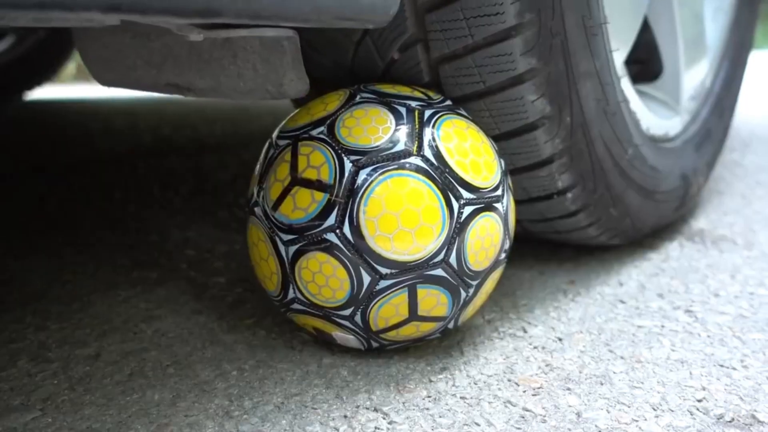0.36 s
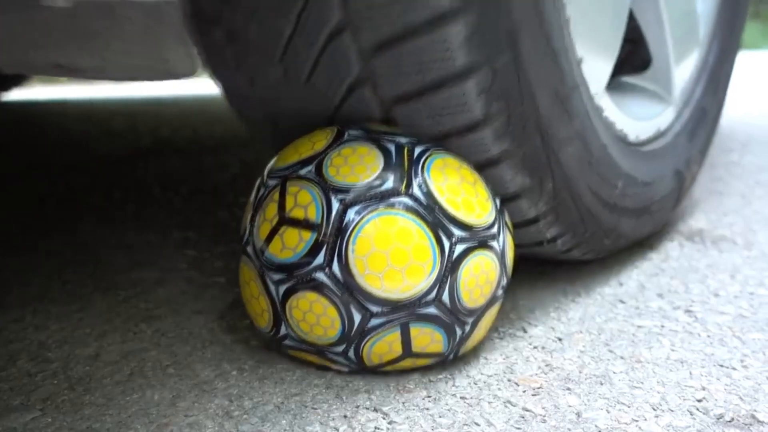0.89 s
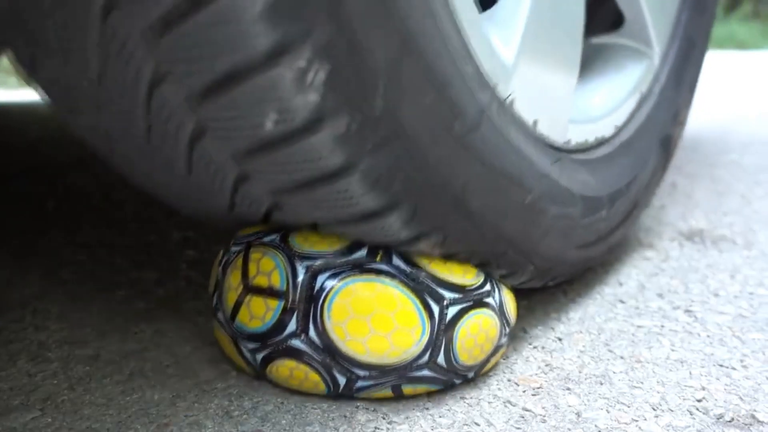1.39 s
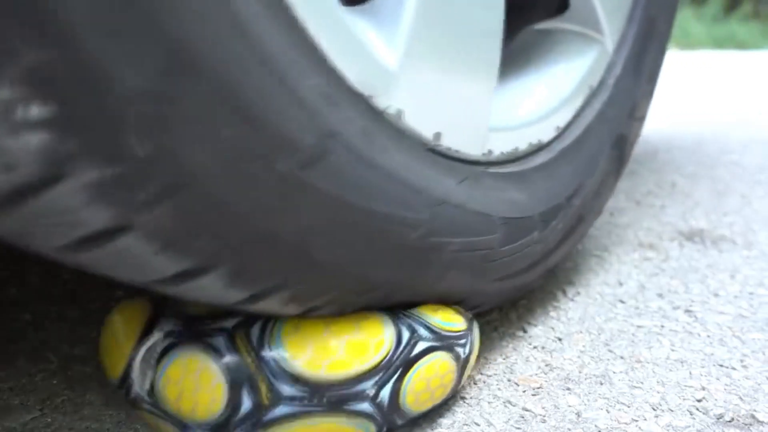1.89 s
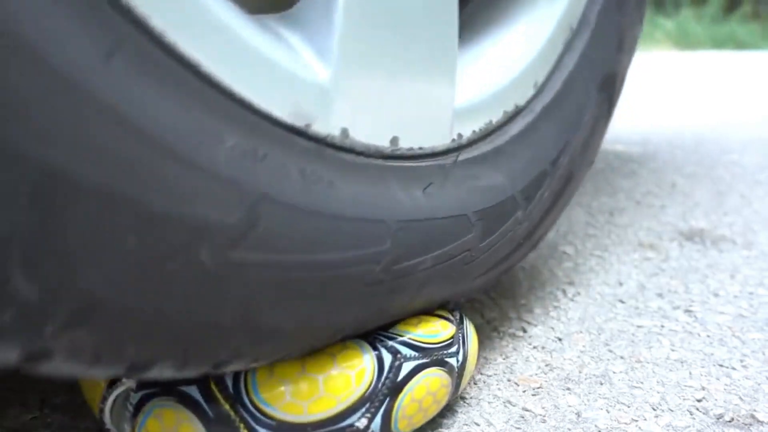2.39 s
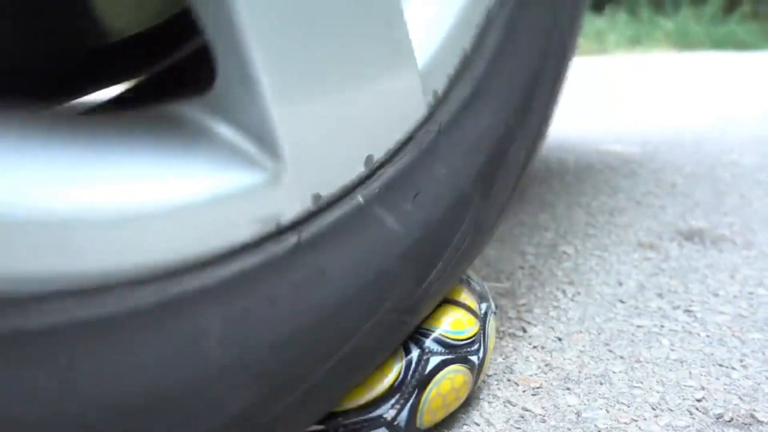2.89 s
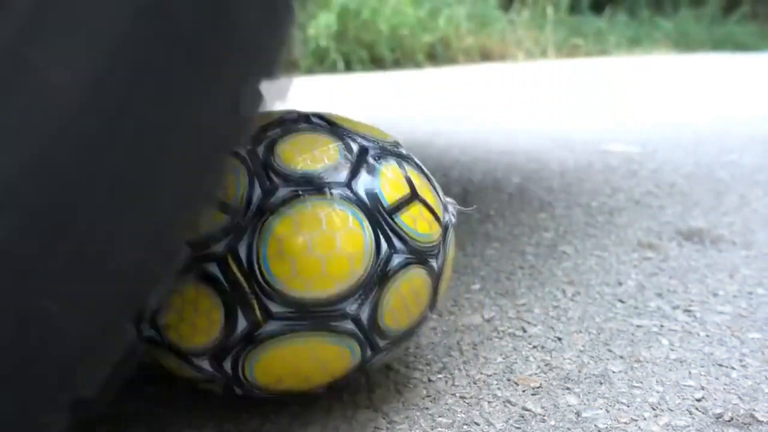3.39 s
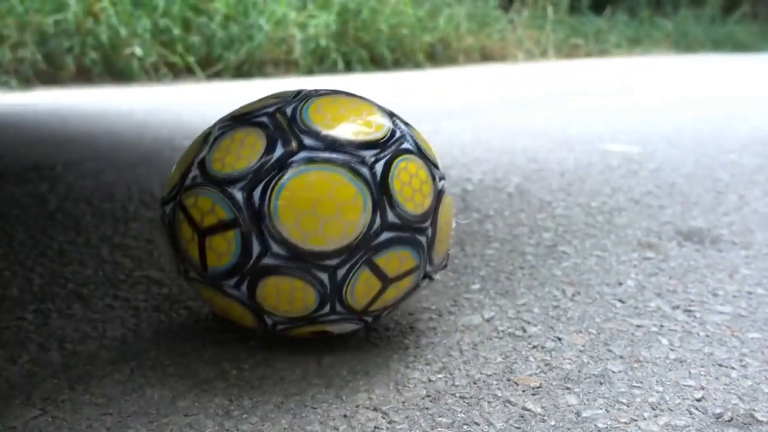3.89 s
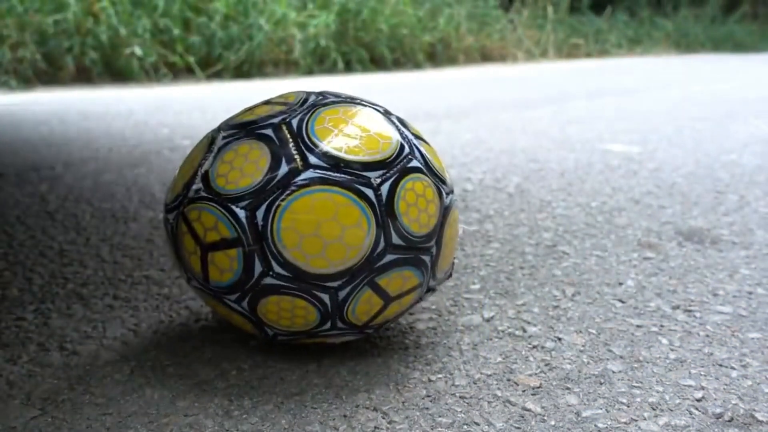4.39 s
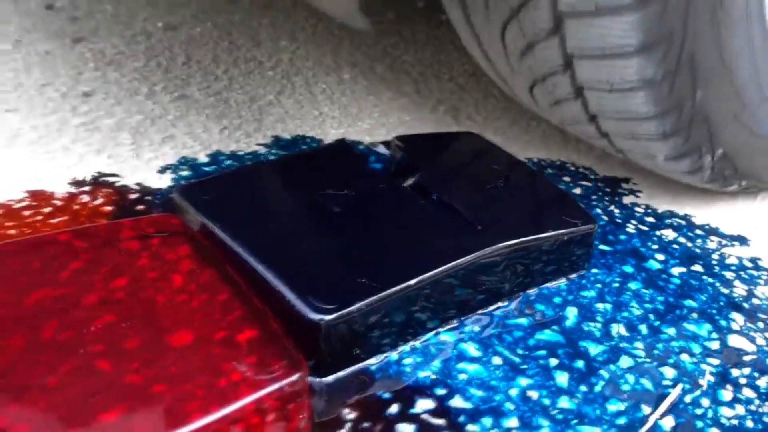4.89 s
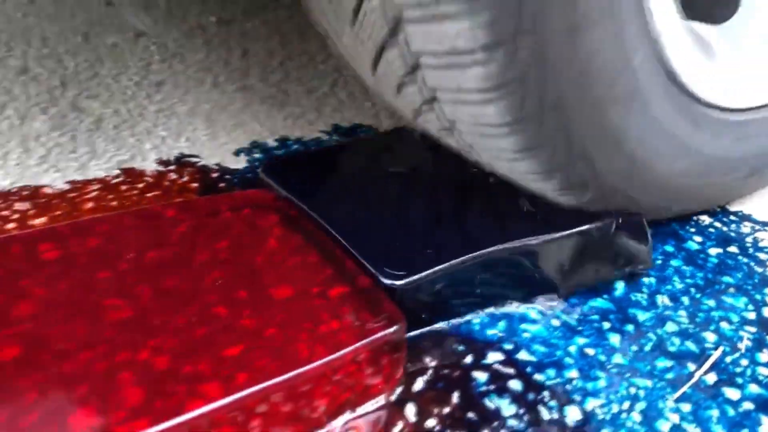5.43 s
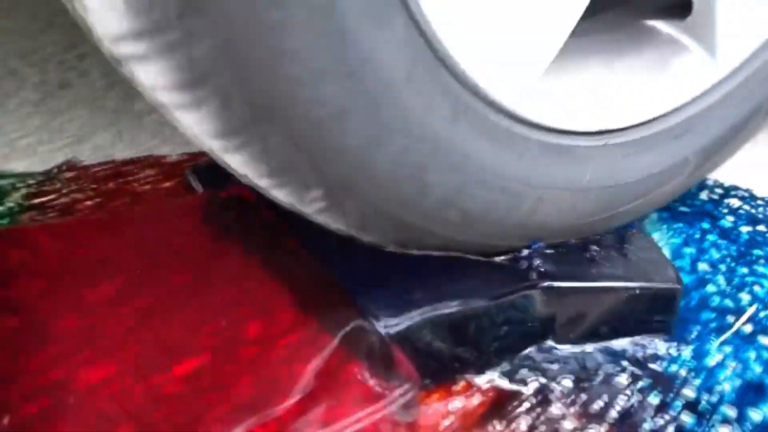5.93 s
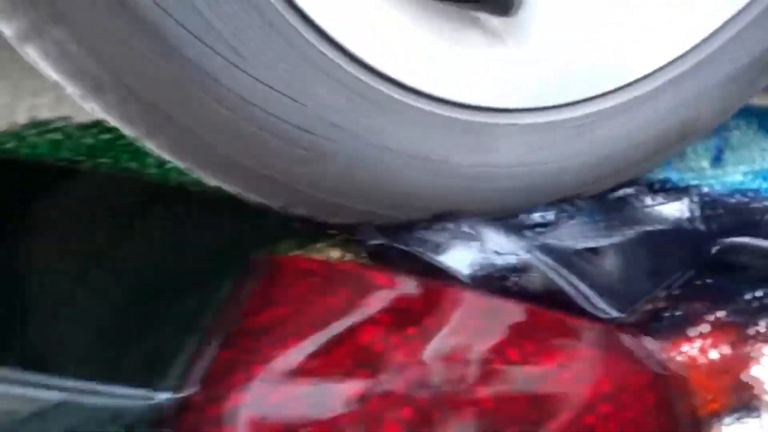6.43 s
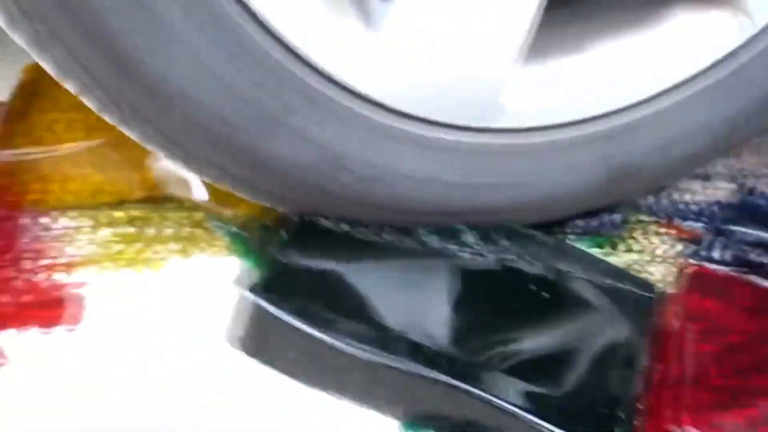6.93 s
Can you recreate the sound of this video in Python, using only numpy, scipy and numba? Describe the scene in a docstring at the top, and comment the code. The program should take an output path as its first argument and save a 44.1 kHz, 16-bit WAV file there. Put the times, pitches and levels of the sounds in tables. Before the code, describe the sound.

Close to asphalt, only faint air is heard until about 0.4 s, when single creaks begin and quicken into a rubbery stutter by 0.9. Low hollow thumps land around 1.0-1.1. Skin rubbing continues with a sharp snap at 1.5, then swells into a loud, rough, midrange groan with deep rumble from 1.7 to 2.2. It drops to a cluster of dry gritty snaps, densest around 2.3-2.9, then rubbing rises again and a shaky harmonic squeal slides upward at 3.15-3.4. The freed ball gives soft hollow bounces and scuffs from 3.55 to 4.1, with faint thin metallic whines fading. After a tiny silent gap at 4.63, an idling engine hums low and pulses softly. Jelly on the left ticks sparsely, with a stronger crack at 5.18, then from 5.7 crackles densely, squelching and tearing wetly, loudest around 6.2-6.6, easing slightly until the end at about 7.

```python
"""Asphalt under a slow car, a small stereo microphone close to the ground. A tyre creeps over a soft ball:
stick-slip pulses and scrape noise ring the skin, clicks snap, harmonics squeal free, damped tones bounce.
After a cut the same slow tyre squashes slabs of jelly on the left: random clicks crackle, bursts of tiny
pops squelch, and wet cracks ring over an idling engine of low harmonics and pulsing noise.
Scattered short echoes stand for the car's underside."""
import sys
import numpy as np
from scipy import signal
from scipy.fft import rfft, irfft
from scipy.io import wavfile
from scipy.ndimage import uniform_filter1d
from numba import njit

SR = 44100
rng = np.random.default_rng(int(sys.argv[2]) if len(sys.argv) > 2 else 0)


def int16_out(signal):
    """Quantize to a 16-bit WAV file."""
    q = np.round(np.clip(np.atleast_2d(signal).T, -1, 1) * 32767)
    wavfile.write(sys.argv[1], SR, q.astype(np.int16))


def amplitude_ratio(level_db):
    """Convert a level in decibels to the matching linear amplitude (field) ratio."""
    exponent = np.asarray(level_db, float) / 20
    return 10 ** exponent


N = 310905
T = np.arange(N) / SR
SIDES = np.array([[1], [-1]])  # left, right
HARD_DB = -20  # rubbing level at which the ball's settings hold
JELLY_LAG = 8  # samples by which the right microphone hears the jelly later


def unit(x):
    """Scale to rms 1."""
    return x / np.sqrt(np.mean(x ** 2))


def read(table):
    """Columns of a timed table at every sample, and where it is active."""
    s, *columns = np.transpose(table)
    active = uniform_filter1d(1. * ((T >= s[0]) & (T <= s[-1])), size=441)
    return [np.interp(T, s, c) for c in columns] + [active]


def colour(x, points, size=4096):
    """Causal filter through (Hz, dB) points, from the folded cepstrum of the log gain; output rms 1."""
    hz, db = np.transpose(points)
    bins_hz = np.arange(size // 2 + 1) * SR / size
    gain_db = np.interp(np.log(bins_hz + 1), np.log(hz), db)
    cepstrum = irfft(gain_db * np.log(10) / 20)
    cepstrum[1:size // 2] *= 2
    cepstrum[size // 2 + 1:] = 0
    response = irfft(np.exp(rfft(cepstrum)))
    return unit(signal.fftconvolve(x, response)[:N])


@njit
def svf(x, hz, width):
    """State-variable band-pass with a moving centre, gain 1 there; width in Hz."""
    y, band, low = np.empty(len(x)), 0., 0.
    for i in range(len(x)):
        g, k = np.tan(np.pi * hz[i] / SR), width / hz[i]
        v = (band + g * (x[i] - low)) / (1 + g * (g + k))
        band, low, y[i] = 2 * v - band, low + 2 * g * v, k * v
    return y


def high_pass(x, hz, order=1):
    """Butterworth high-pass."""
    return signal.sosfilt(signal.butter(order, hz, "high", fs=SR, output="sos"), x)


def walk(rate):
    """Random levels held 1 / rate s and slewed twice; spread near 1."""
    k = int(SR / rate)
    held = np.repeat(rng.standard_normal(N // k + 1), k)
    return 1.288 * uniform_filter1d(uniform_filter1d(held, k), k)[:N]


def tail(x, ms):
    """Let each impulse die away exponentially, with a time constant in ms."""
    return signal.lfilter([1], [1, -np.exp(-1000 / (ms * SR))], x)


def place(x, pan_db, lag=0):
    """Share between the two microphones; the right one hears it lag samples later."""
    left = 2 / (1 + amplitude_ratio(-pan_db))
    return np.array([x * left, np.roll(x, lag) * (2 - left)])


def add(out, s, x, pan_db, lag):
    """Mix one short sound in at time s."""
    i = int(s * SR)
    out[:, i:i + len(x)] += place(x, pan_db, lag)[:, :N - i]


def wide(points, shared):
    """Stereo noise of one colour, partly shared by the microphones."""
    mid, side = (colour(rng.standard_normal(N), points) for _ in range(2))
    return mid + (1 - shared) * high_pass(side, 900) * SIDES


def spread(x, low_db, high_db):
    """A broad contact patch: the sound flutters between left and right, the treble most."""
    return x + (amplitude_ratio(low_db) * x + amplitude_ratio(high_db) * high_pass(x, 1500)) * walk(300) * SIDES


def underside(x, db, t60):
    """Short scattered echoes from the car's floor and the road, different at each microphone."""
    t = np.arange(4096) / SR
    echo = rng.standard_normal((2, 4096)) * amplitude_ratio(-60 * t / t60) * (t > .0008)
    echo = high_pass(echo, 700)
    wet = signal.fftconvolve(x, echo / np.sqrt(np.sum(echo ** 2, axis=1, keepdims=True)), axes=1)
    return x + amplitude_ratio(db) * wet[:, :N]


def clicks(table, fizz_db, t60, echo_db, lag, sharp=0.91):
    """A sharp tick ringing broadly around its centre, a fizzing tail, and a slap back from the car's floor."""
    out, size = np.zeros((2, N)), 1536
    t, noise = np.arange(size) / SR, rng.standard_normal((80, size))
    for (s, db, hz, top_db, pan_db), fizz in zip(table, noise):
        kick = amplitude_ratio(fizz_db - 60 * t / t60) * fizz
        kick[0] += 1
        kick[int(.0034 * SR)] += amplitude_ratio(echo_db)
        centre = np.full(size, 1. * hz)
        # sharper ticks share one bandwidth
        width = hz ** (1 / sharp) * 1800 ** (1 - 1 / sharp) / sharp
        body = svf(svf(kick, centre, width * 1.05), centre, width * 3.5 / sharp)
        top = high_pass(kick, 5000, order=2)
        tick = body / np.abs(body).max() + amplitude_ratio(top_db) * top / np.abs(top).max()
        add(out, s, amplitude_ratio(db) * tick / np.abs(tick).max(), pan_db, lag)
    return out


def sputters(table, lag):
    """Clusters of tiny pops, each cluster ringing at its own pitch; they start faster than they end."""
    out, size = np.zeros((2, N)), 4096
    t = np.arange(-size // 2, size // 2) / SR
    chance = rng.standard_normal((len(table), 2, size))
    for (s, db, hz, length, pan_db), (fizz, grain) in zip(table, chance):
        env = np.exp(-.5 * (t / (np.where(t < 0, .26, .55) * length)) ** 2)
        pitch = np.full(size, 1. * hz)
        grains = fizz * np.exp(1.3 * grain) * env
        pops = svf(svf(grains, pitch, hz / 5.5), pitch, hz / 2.2)
        even = np.sqrt(np.sum(env ** 2) / np.sum(pops ** 2))
        add(out, s + t[0], amplitude_ratio(db) * pops * even, pan_db, lag)
    return out


# steady background air at the microphones: [freq_hz, relative density_db per Hz]
AIR_COLOUR = [(15, -45), (25, -6), (54, -9), (92, -11), (146, -6), (193, -8.5), (231, -7.5), (1180, -18.5),
              (2820, -19), (4140, -31), (11200, -34), (14600, -71), (22000, -120)]


def air():
    """Faint wide noise, almost independent at the two microphones in the treble."""
    return amplitude_ratio(-56.5 + .5 * walk(32.0)) * wide(AIR_COLOUR, 0.046)


@njit
def slips(rate, uneven, chance):
    """Stick-slip: one release per cycle; uneven cycles vary in length and size."""
    out, p, k = np.zeros(len(rate)), 0., 0
    for i in range(len(rate)):
        p += rate[i] * np.exp(uneven[i] * chance[k, 0]) / SR
        if p >= 1:
            p, k = p - 1, k + 1
            out[i] = np.exp((.2 + .45 * uneven[i]) * chance[k, 1])
    return out


# stretches where the contact changes:
# [middle_s, length_s, grit_db change, unevenness taken away (0-1), scrape_db change]
CONTACT_CHANGES = [(0.58, 0.72, -5, .05, 1), (.6, 0.37, 1.3, .05, 3), (1.864, 0.1, 2.5, 0.03, 2.5),
                   (2.427, 0.2, -3, 0, 1.5), (2.62, 0.21, -0.5, .25, -5), (2.766, 0.62, 4.5, 0.4, 3),
                   (3.235, 0.13, 6, 0.12, -4), (3.9, 0.98, 0, 0.03, 13), (4.45, 0.53, 3.5, 0, 16)]


def contact(column):
    """Sum of one column of the contact changes, each a flat-topped bell."""
    return sum(row[column] * np.exp(-((T - row[0]) / (.5 * row[1])) ** 4) for row in CONTACT_CHANGES)


# the ball lurches under the load: [middle_s, length_s, rumble_db, boom_db]
LURCH_TIMES = [(0.757, 0.13, -45.5, -51), (1.028, 0.096, -39, -50), (1.13, 0.048, -42, -43.5),
               (1.562, 0.019, -43, -66), (1.817, 0.12, -28.5, -23), (1.97, 0.14, -36, -28.5),
               (3.106, 0.089, -36.5, -42), (3.3, 0.045, -37, -60), (3.565, 0.13, -48, -56),
               (3.752, 0.76, -59, -55.5), (4.038, 0.09, -65, -60)]


def lurch(column):
    """Summed gain of the lurches, each a bell in time, added as powers."""
    return np.sqrt(sum(amplitude_ratio(2 * row[column]) * np.exp(-((T - row[0]) / (.5 * row[1])) ** 2)
                       for row in LURCH_TIMES))


# the air in the ball, upper and lower part: [freq_hz, relative density_db per Hz]
RUMBLE_COLOUR = [(65, -23), (110, -4.5), (199, -2.5), (232, 5.5), (273, -3), (324, -21), (350, 0.5),
                 (460, -21), (770, -120)]
BOOM_COLOUR = [(21, -53), (35, -32), (48, -28), (75, -9.5), (120, -13.5), (160, -14.5), (260, -120)]


def ball_air(effort):
    """The air in the ball follows the rubbing and swells at each lurch: a rumble and a deeper boom."""
    rumble_gain = np.hypot(amplitude_ratio(-35.5 + 1.03 * effort), lurch(column=2))
    rumble = rumble_gain * amplitude_ratio(0.54 * walk(23.0)) * colour(rng.standard_normal(N), RUMBLE_COLOUR)
    boom_gain = np.hypot(amplitude_ratio(-44 + effort), lurch(column=3))
    boom = boom_gain * amplitude_ratio(2.0 * walk(9.55)) * colour(rng.standard_normal(N), BOOM_COLOUR)
    return rumble + boom


# ball under the tyre: [s, rubbing level_db, dryness_db, skin resonance_hz]
RUBBING = [(0.0, -65.5, -27, 800), (0.2, -68.5, -6, 700), (0.4, -75.5, -15, 700), (0.444, -59, -21, 635),
           (0.56, -52, 3, 770), (0.676, -44, 0.5, 970), (0.82, -41, 4, 734), (0.916, -32, -4, 675),
           (1.09, -37, -2.5, 736), (1.3, -33.5, -7, 860), (1.42, -33.5, -9, 1050), (1.568, -40, -3, 900),
           (1.65, -34, -5.5, 910), (1.67, -21, -8.5, 850), (1.7, -29, 2.5, 950), (1.756, -17.5, -15, 1027),
           (1.88, -19.5, -8.5, 1025), (2.0, -17.5, -13, 935), (2.13, -18.5, -11.5, 1046),
           (2.22, -23, -9, 1046), (2.27, -28.5, -13.5, 1060), (2.32, -40, -2, 980),
           (2.43, -41.5, 6.5, 1150), (2.55, -38, -4.5, 990), (2.65, -33.5, -5, 990), (2.8, -34, -9.5, 960),
           (2.95, -31, -6.5, 940), (3.02, -31, -6.5, 845), (3.085, -27, -9.5, 940),
           (3.125, -28.5, -10, 680), (3.208, -21.5, -10, 1370), (3.232, -23, -7.5, 1440),
           (3.26, -23, -8.5, 915), (3.3, -24, -5, 940), (3.4, -22.5, -11.5, 930),
           (3.468, -30.5, -12.5, 769), (3.54, -50, -6, 666), (4.074, -51.5, -10.5, 805),
           (4.44, -68, -2.5, 730), (4.546, -57, -11, 690), (4.63, -62.5, -11, 680)]
# stretched skin, its grit, its dry hiss: [freq_hz, relative density_db per Hz]
SKIN_COLOUR = [(180, -42), (300, 8.5), (417, 3), (1000, -2), (1230, 2.5), (1370, 1), (1710, -3.5),
               (2500, -13), (3250, -41), (5500, -120)]
GRIT_COLOUR = [(1290, -16.5), (2200, 1), (3580, -1.5), (5800, -11.5), (7540, -28.5), (12800, -120)]
HISS_COLOUR = [(3060, -40), (5200, -11), (6350, -4), (10500, -4), (11200, -11.5), (14600, -15),
               (22000, -120)]
# narrow modes of the stretched skin: [share of the skin resonance, gain_db]
SKIN_RINGS = [(1.0, 23), (1.32, 13), (0.78, 9)]
# where the ball sits: [s, left minus right_db]
BALL_SIDE = [(0, 1), (.42, -2), (1.6, 0), (2.0, 1), (2.4, -0.5), (3.4, 0.5), (4.07, 5), (4.45, 10),
             (4.63, 9)]


def ball():
    """Slips and scrape drive the skin; harder rubbing slips faster, less evenly, and scrapes more."""
    skin_db, dry_db, hz, on = read(RUBBING)
    effort = skin_db - HARD_DB
    rate = 330 * amplitude_ratio(0.46 * effort)  # slips per s
    uneven = np.clip(.62 + 0.27 * effort - contact(column=3), .1, .8)
    scrape_db = 1 + 0.2 * effort + contact(column=4)
    pulses = slips(rate, uneven, rng.standard_normal((4000, 2)))
    kicks = pulses + 0.41 * tail(pulses, 2.17) * rng.standard_normal(N)
    # equal power whatever the slip rate
    kicks = kicks / np.sqrt(uniform_filter1d(kicks ** 2, size=4000) + 1e-9)
    scrape = amplitude_ratio(scrape_db + 1.5 * walk(40)) * rng.standard_normal(N)
    drive = (kicks + scrape) / np.sqrt(1 + amplitude_ratio(2 * scrape_db))

    skin = colour(drive, SKIN_COLOUR)
    rings = 0
    for share, db in SKIN_RINGS:
        wandering_hz = share * hz * (1 + .03 * walk(30))
        rings = rings + amplitude_ratio(db + 2.5 * walk(40)) * svf(skin, wandering_hz, 90.)
    skin = unit(skin + 10.0 * svf(skin, hz, 490.0) + rings)
    # dry contact hisses and grinds
    grit = amplitude_ratio(0.6 + 0.72 * dry_db + contact(column=2)) * colour(drive, GRIT_COLOUR)
    hiss = amplitude_ratio(dry_db) * colour(drive + .25 * kicks, HISS_COLOUR)
    rub = amplitude_ratio(skin_db) * (skin + grit + hiss)
    placed = place(on * rub + squeal(), read(BALL_SIDE)[0])
    return spread(placed + on * ball_air(effort), -20.0, -21.0)


# the ball's hollow thumps and bounces: [start_s, level_db, pitch_hz, t60_s]
THUMP_TIMES = [(0.149, -41.5, 645, 0.059), (1.012, -15, 122, 0.15), (1.036, -12.5, 152, 0.051),
               (1.121, -11, 220, 0.016), (1.556, -20.5, 205, 0.046), (1.752, -42, 119, 0.044),
               (1.846, -23, 99, 0.11), (3.555, -22.5, 310, 0.037), (3.592, -38, 330, .025),
               (3.617, -29, 370, 0.042), (3.782, -34, 520, 0.053), (3.813, -34, 470, 0.055),
               (3.891, -27, 286, 0.034), (3.909, -34, 180, 0.036), (3.93, -31, 297.4, 0.035),
               (3.97, -31, 463, 0.045), (3.992, -31, 460, 0.033), (4.013, -24, 315, 0.02),
               (3.996, -36, 130, .07), (4.033, -38, 148, 0.069), (4.521, -37.5, 229, 0.045)]


def thumps():
    """A soft push rings the ball's air and a higher skin mode."""
    out, t = np.zeros((2, N)), T[:8192]
    for s, db, hz, t60 in THUMP_TIMES:
        ring = np.sin(2 * np.pi * hz * t) + 0.15 * np.sin(2 * np.pi * 1.75 * hz * t)
        push = 1 - np.exp(-t / 0.0014)
        add(out, s, amplitude_ratio(db - 60 * t / t60) * push * ring, 0, lag=0)
    return out


# first contact, single creaks: [start_s, peak_db]
CREAK_TIMES = [(.355, -50), (.387, -47), (.418, -45), (.443, -38), (.465, -40), (.487, -36), (.508, -29),
               (.526, -32), (.545, -25), (.567, -32), (.576, -24), (.602, -24), (.62, -28), (.628, -21),
               (.645, -18), (.661, -16), (.676, -17), (.691, -19), (.704, -18), (.717, -23), (.729, -17),
               (.742, -18), (.755, -17), (.768, -17), (.784, -18), (.797, -17), (.81, -16), (.831, -14),
               (.845, -20), (.856, -11.5), (.883, -11.5), (.902, -17), (.922, -14), (.955, -17),
               (.982, -18)]
# their usual pitch: [s, centre_hz]
CREAK_PITCH = [(.44, 640), (.55, 1180), (.7, 1030), (.8, 620), (.93, 720)]


def creaks():
    """Single slips of the skin: broad ticks of scattered pitch and side."""
    chance = rng.standard_normal((len(CREAK_TIMES), 2))
    s, db = np.transpose(CREAK_TIMES)
    hz = np.interp(s, *np.transpose(CREAK_PITCH)) * amplitude_ratio(1.2 * chance[:, 0])
    treble_db, pan_db = np.full(len(s), 3), 1.2 + 2.2 * chance[:, 1]
    rows = np.c_[s, db, hz, treble_db, pan_db]
    return clicks(rows, fizz_db=-3, t60=.018, echo_db=-17, lag=0, sharp=0.69)


# grit and seams snapping: [start_s, peak_db, centre_hz, treble peak_db against it, left minus right_db]
SNAP_TIMES = [(1.141, -29, 703, -10, 3), (1.326, -30, 961, -21.5, 6), (1.505, -4.5, 1610, -30, 2),
              (1.578, -20, 2030, -23, 0.0), (1.607, -11, 3180, -19, 3), (1.632, -11.5, 1740, -19, -1),
              (1.668, -5, 730, -12.5, 4), (1.715, -5, 1080, -13, 1), (1.892, -5, 1150, -19, 18),
              (1.946, -4, 1330, -24, 7), (2.166, -9, 1010, -19, 3), (2.194, -21, 1100, -6, 3.5),
              (2.258, -12, 2900, -13, 2), (2.266, -11, 1538, -22, 1), (2.278, -30, 1993, -17, -0.5),
              (2.2955, -16, 2001, -16, -4), (2.317, -14, 2040, -17, -2), (2.349, -10.5, 2950, -22, -3),
              (2.374, -22, 1690, -11, -6), (2.391, -11, 2110, 3, 4), (2.409, -18.5, 2950, -3, -15),
              (2.4365, -11.5, 1500, -20, -1), (2.5187, -9, 2500, -8.5, 0), (2.585, -15, 2580, -15, -3),
              (2.606, -15, 2310, -16, -4), (2.681, -9, 2370, -18, 0), (2.72, -11, 2476, -17, -3),
              (2.7235, -8, 2200, -22, -1), (2.754, -15, 2300, -17, -1), (2.79, -12, 2730, -13, -4),
              (2.7405, -8.5, 2219, -23, -3), (2.7512, -6, 2110, -5, -1.5), (2.7716, -22, 3630, -24, -8),
              (2.794, -6.5, 2278, -7, -5), (2.808, -6.5, 2600, -11, -3), (2.7295, 0, 3500, -4, -3),
              (2.655, -13, 4530, -13, -1), (2.8739, -13.5, 3701, -16, -2), (2.897, -12, 2500, -15, -1),
              (3.017, -12.5, 700, -28, -1), (3.148, -12, 1100, -16, 5), (3.202, -5, 1490, -21, 6),
              (3.617, -30, 1073, -23, 11), (3.783, -32, 654, -25, -4), (3.813, -28, 1047, -20, 10),
              (3.892, -30, 600, -21, 11), (3.9715, -25, 2350, -27, -13), (4.117, -36, 600, -16, -2),
              (4.1444, -26.5, 4770, -4, 2), (3.7593, -37, 7350, -9, 1), (3.8621, -29, 4200, -3, 2),
              (3.9648, -33, 6330, -8, 0), (3.9948, -33, 5200, -12, 1), (4.0212, -31.5, 6500, -9, -1),
              (4.077, -38, 1250, -25, 5), (4.037, -33, 1300, -25, 5), (4.215, -41, 646, -21, 7)]


def snaps():
    """Grit and seams let go: short dry ticks with a brief fizz."""
    return clicks(SNAP_TIMES, fizz_db=-18.5, t60=0.008, echo_db=-22, lag=0)


# the skin squeals as it slides out: [s, pitch_hz, level_db]
SQUEAL_PATH = [(3.13, 268, -50), (3.154, 261.3, -36), (3.198, 304.9, -31.5), (3.245, 284, -28),
               (3.29, 281.4, -27), (3.318, 294, -22.5), (3.33, 332, -24), (3.365, 334.4, -23.5),
               (3.394, 347, -37), (3.44, 357, -54)]
# strength of the squeal's harmonics: [freq_hz, level_db]
SQUEAL_COLOUR = [(280, -4), (600, -7), (950, 2), (1200, -6), (1500, -7), (2100, -13), (2800, -12),
                 (3600, -20)]


def squeal():
    """Regular fast slips: a stack of harmonics on a shaky pitch, each flickering."""
    pitch, db, sliding = read(SQUEAL_PATH)
    near = sliding > 0
    phase = 2 * np.pi * np.cumsum(pitch * (1 + .014 * walk(120)))[near] / SR
    hz, body_db = np.transpose(SQUEAL_COLOUR)
    out = np.zeros(N)
    for k in range(1, 13):
        flicker_db = 4.0 * walk(50)[near]
        harmonic_db = np.interp(np.log(k * pitch[near]), np.log(hz), body_db) + flicker_db
        out[near] += amplitude_ratio(harmonic_db) * np.sin(k * phase + 0.421 * k * k)
    return np.sqrt(2) * sliding * amplitude_ratio(db) * out


# faint metal whines as the wheel rolls off: [pitch_hz, start_s, level_db, t60_s]
WHINE_TONES = [(2120, 3.5, -46, 0.43), (1840, 3.44, -52.5, 3.2)]


def whines():
    """Narrow wavering tones that fade: noise through a very narrow band."""
    noise, out = rng.standard_normal(N), 0
    for hz, s, db, t60 in WHINE_TONES:
        fade = (T > s) * amplitude_ratio(db - 60 * np.maximum(T - s, 0) / t60)
        out = out + fade * unit(svf(noise, np.full(N, 1. * hz), 8.))
    return out


# the freed ball scuffs the road as it settles: [middle_s, level_db, pitch_hz, length_s, left minus right_db]
SCUFF_TIMES = [(3.625, -45, 950, 0.015, 2), (3.785, -47, 603, 0.0069, 0), (3.822, -40.5, 1350, 0.014, 3),
               (3.9, -45.5, 500, 0.026, -2), (3.935, -42, 840, 0.0086, 7), (3.974, -33.5, 2280, 0.004, -1),
               (3.98, -43.5, 1420, 0.02, 7), (4.02, -48, 450, 0.011, 1), (4.117, -46, 1392, 0.0063, 8)]


def scuffs():
    """The freed ball brushes the road: small clusters of pops."""
    return sputters(SCUFF_TIMES, lag=0)


# harmonics of the idle: [multiple of the firing rate, level_db]
FIRING_HARMONICS = [(2, -14), (3, -4), (5, -20), (10, -16)]
# engine body noise: [freq_hz, relative density_db per Hz]
ENGINE_COLOUR = [(15, -26), (25, -3), (69, -3), (168, -5.5), (226, -7), (438, -11), (515, -6.5), (753, -10),
                 (1400, -17), (1930, -15.5), (3000, -23.5), (3900, -25), (6600, -120)]


def engine():
    """Low harmonics of the firing rate and a body noise that puffs with each firing, louder under load."""
    idle_hz, loaded_s = 22.6, 5.2
    phase = np.cumsum(idle_hz * (1 + 0.004 * walk(3))) / SR
    drone = sum(amplitude_ratio(db + 1.2 * walk(6)) * np.sqrt(2) * np.sin(2 * np.pi * k * phase)
                for k, db in FIRING_HARMONICS)
    noise_db = np.interp(T, [loaded_s - .3, loaded_s + 0.48], [-42.5, -40.5]) + 2.0 * walk(9)
    puffs = 1 + 0.21 * np.cos(2 * np.pi * phase)
    return amplitude_ratio(-42.5) * drone + amplitude_ratio(noise_db) * puffs * wide(ENGINE_COLOUR, 0.2)


# jelly under the tyre: [s, crackle level_db, left minus right_db]
SQUASHING = [(4.659, -50.5, 10), (4.85, -48, 13.5), (5.17, -48.5, 9.5), (5.619, -51.5, 6.5),
             (5.72, -42, 18), (5.9, -37, 16.5), (6.16, -32.5, 13), (6.54, -34.5, 14), (7.05, -38.5, 9)]
# wet crackle and its treble fizz: [freq_hz, relative density_db per Hz]
JELLY_COLOUR = [(240, -48), (400, -4.5), (828, -0.5), (1170, -5), (1920, 0), (2250, -0.5), (2440, 2),
                (4800, -8.5), (6240, -14.5), (10600, -120)]
FIZZ_COLOUR = [(2470, -10.5), (4200, -24), (5440, -2), (6570, -1), (10600, -6), (11200, -11), (14600, -48),
               (22000, -120)]


def jelly():
    """Fine wet crackle: random clicks over a fizz; pockets of each size come and go on their own."""
    level_db, pan_db, on = read(SQUASHING)
    pops = (rng.random(N) < 1200 / SR) * amplitude_ratio(1.8 * rng.exponential(size=N))  # 1200 per s
    drive = unit(tail(pops, .4) * rng.standard_normal(N)) + .9 * rng.standard_normal(N)
    body = colour(drive, JELLY_COLOUR)
    pockets = sum(amplitude_ratio(3.2 * walk(55)) * svf(body, np.full(N, hz), hz / 2.5)
                  for hz in 600 * 1.5 ** np.arange(6))
    fizz_db = -41 + 1.01 * (level_db + 34)  # -41 dB where the crackle is at -34 dB
    fizz = amplitude_ratio(fizz_db + 1.2 * walk(45)) * colour(drive, FIZZ_COLOUR)
    return place(amplitude_ratio(level_db) * unit(pockets) + fizz, pan_db, lag=JELLY_LAG)


# sharp cracks as the jelly tears: [start_s, peak_db, centre_hz, treble peak_db against it]
CRACK_TIMES = [(4.736, -36, 1190, -22), (4.753, -24, 1070, -21), (4.786, -28, 2140, -22),
               (4.818, -21.5, 1840, -26), (4.886, -21.5, 3660, -12), (4.893, -24, 2290, -14),
               (4.939, -26.5, 2600, -27), (5.02, -40, 4540, -20), (5.063, -24, 2200, -22),
               (5.085, -28, 802, -23), (5.18, -13.5, 1010, -4), (5.1799, -18.5, 2350, -10),
               (5.296, -31, 4800, -11), (5.327, -23.5, 2720, 1), (5.687, -27, 2440, -23),
               (5.781, -25, 910, -19), (5.79, -18, 1600, -21), (5.829, -18, 1630, -25),
               (5.838, -15, 1490, -25), (5.744, -27, 4300, -14), (5.968, -29, 7040, -6),
               (5.848, -26, 1640, -15), (5.878, -23, 1010, -17), (5.904, -20, 1380, -15),
               (5.921, -20.5, 4170, -10), (5.948, -10, 2440, -27), (5.95, -21, 2800, -22),
               (5.957, -28, 4170, -18), (5.967, -27, 2730, -20), (5.993, -32, 3300, -9),
               (6.018, -17, 2650, -20), (6.058, -29, 3090, -19), (6.093, -27, 2570, -14),
               (6.167, -14, 2200, -23), (6.173, -10, 2460, -22), (6.1863, -7.5, 2390, -25),
               (6.203, -18, 4860, 2), (6.23, -28, 4000, -16), (6.278, -11.5, 2120, -14),
               (6.315, -12, 5460, 0), (6.364, -24, 2600, -16), (6.392, -15, 7900, -14),
               (6.406, -19.5, 5000, -4), (6.449, -8, 1080, -23), (6.463, -23, 1230, -20),
               (6.476, -27, 2200, -10), (6.523, -9.5, 1860, -17), (6.532, -10, 2830, -21),
               (6.535, -22, 2980, -20), (6.558, -13, 1510, -18), (6.572, -8.5, 2900, -11),
               (6.616, -17, 3000, -25), (6.673, -23, 8050, -8), (6.724, -31, 7500, -8),
               (6.606, -18.5, 1110, -21), (6.627, -17.5, 960, -22), (6.645, -18.5, 2590, -16),
               (6.697, -12.5, 1980, -22), (6.718, -22, 1940, -18), (6.765, -35, 2060, -16),
               (6.801, -24, 1500, -14), (6.8, -28, 4200, -20), (6.85, -21, 1620, -15),
               (6.865, -18, 3950, -8), (6.887, -13.5, 1480, -10), (6.866, -15.5, 1500, -18),
               (7.005, -21, 4160, -22), (6.93, -12, 1740, -21), (6.954, -20, 1480, -20)]


def cracks():
    """The jelly tears: wet cracks on the left, ringing more narrowly than dry snaps."""
    rows = [(*row, 10) for row in CRACK_TIMES]  # 10 dB to the left
    return clicks(rows, fizz_db=-17.5, t60=0.022, echo_db=-18, lag=JELLY_LAG, sharp=1.7)


# the larger pockets of jelly burst: [middle_s, level_db, pitch_hz, length_s]
LARGE_POCKETS = [(4.758, -47, 1070, 0.029), (4.788, -35, 2130, 0.01), (4.824, -36.5, 2190, .014),
                 (4.894, -31.5, 2480, 0.0032), (5.063, -43.5, 2280, 0.11), (5.105, -40, 1770, 0.042),
                 (5.182, -35, 1010, 0.014), (5.184, -43.5, 425, 0.022), (5.182, -39, 229, 0.016),
                 (5.329, -40, 2790, .006), (5.408, -39, 740, 0.0078), (5.701, -33, 2240, 0.029),
                 (5.707, -35.5, 1080, 0.036), (5.836, -32, 1540, 0.024), (5.832, -32, 2600, .015),
                 (5.85, -26.5, 5100, 0.0046), (5.893, -37, 865, 0.049), (5.925, -36, 4200, 0.019),
                 (5.949, -26, 2310, 0.0088), (5.952, -27, 3500, 0.0088), (5.997, -32, 3200, 0.011),
                 (6.02, -24.5, 2780, 0.008), (6.056, -27, 3080, 0.03), (6.09, -28.5, 900, 0.019),
                 (6.097, -24, 2500, 0.011), (6.118, -30, 5300, 0.0054), (6.172, -21, 2310, 0.028),
                 (6.19, -23, 2460, 0.018), (6.201, -31.5, 784, 0.015), (6.304, -27, 2180, 0.026),
                 (6.317, -26, 5450, 0.0049), (6.45, -25, 860, 0.013), (6.465, -29, 1300, 0.023),
                 (6.532, -23.5, 910, 0.014), (6.531, -20, 2840, 0.015), (6.58, -25.5, 2760, 0.021),
                 (6.588, -34.5, 5250, 0.023), (6.609, -27, 1290, 0.0082), (6.629, -38, 915, 0.0095),
                 (6.647, -31, 1490, 0.0075), (6.67, -33, 1080, 0.0088), (6.7, -29, 1890, 0.018),
                 (6.718, -31, 2260, 0.015), (6.804, -40, 910, 0.0059), (6.877, -38, 1620, 0.054),
                 (6.888, -32.5, 3800, 0.011), (6.932, -39, 1730, 0.014), (6.957, -32, 830, 0.0061)]


def squelches(count=22):
    """Pockets burst as clusters of pops: the larger ones in turn, then small ones at random."""
    low_hz, high_hz, usual_s = 700, 4300, .008  # small pockets
    s, level_db, pan_db = np.transpose(SQUASHING)
    chance = rng.random((count, 4))
    when = s[0] + .1 + (s[-1] - s[0] - .1) * chance[:, 0]
    small_db = np.interp(when, s, level_db) - 3 + 4 * (2 * chance[:, 1] - 1)
    small_hz = low_hz * (high_hz / low_hz) ** chance[:, 2]
    small = np.c_[when, small_db, small_hz, usual_s * (.5 + chance[:, 3])]
    rows = np.r_[LARGE_POCKETS, small]
    # less to the left than the crackle, and scattered
    side_db = np.interp(rows[:, 0], s, pan_db) - 4.5 + 3 * rng.standard_normal(len(rows))
    return sputters(np.c_[rows, side_db], lag=JELLY_LAG)


def scene():
    """The ball, a short silence at the cut, then the jelly."""
    cut_s, gap_s = 4.634, .022
    under_car = underside(ball() + creaks() + snaps() + scuffs(), -6.5, 0.04)
    first = under_car + thumps() + whines() + air()
    wet = underside(spread(jelly() + squelches(), -12.0, -9.0), -9.5, 0.07)
    second = wet + underside(cracks(), -10, 0.055) + engine()
    fade_out = np.clip((cut_s - T) / 0.0024, 0, 1)
    fade_in = np.clip((T - cut_s - gap_s) / 0.00091, 0, 1)
    return first * fade_out + second * fade_in


def roll_off(x):
    """The treble ends steeply here."""
    return signal.sosfilt(signal.butter(12, 12340, fs=SR, output="sos"), x)


def record(dry):
    """The recorder rounds the loudest peaks and cuts the top steeply."""
    rounded = .8 * np.tanh(dry / .8)
    steep = signal.ellip(8, .3, 32, 11150, fs=SR, output="sos")  # low-pass, edge in Hz
    mix = signal.sosfilt(steep, rounded)
    return roll_off(mix)


dry = scene()
out = record(dry)
int16_out(out)
```